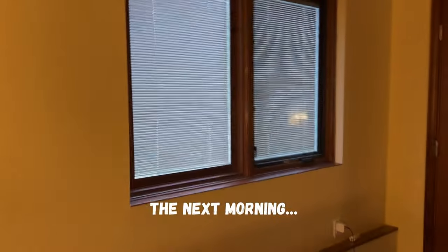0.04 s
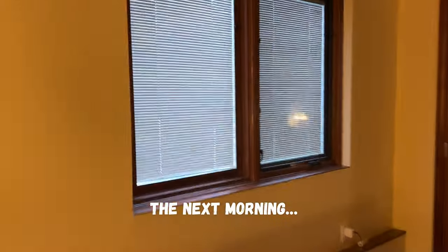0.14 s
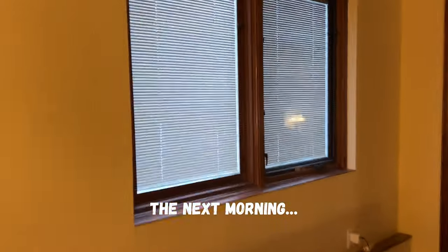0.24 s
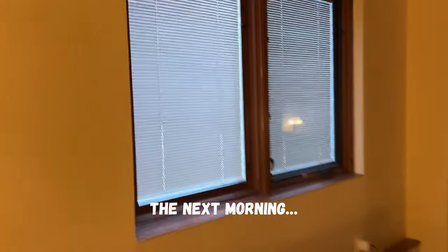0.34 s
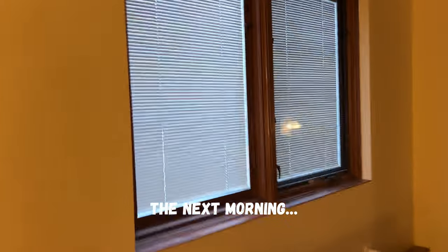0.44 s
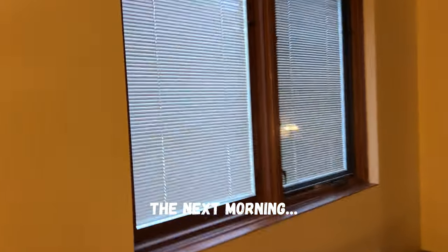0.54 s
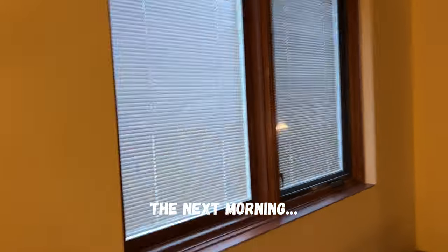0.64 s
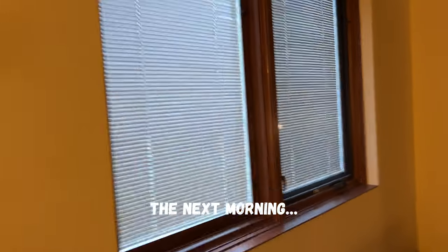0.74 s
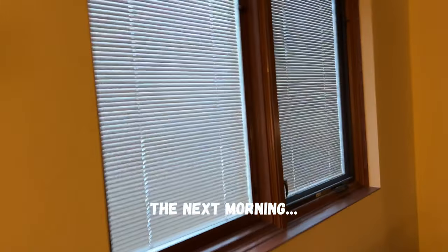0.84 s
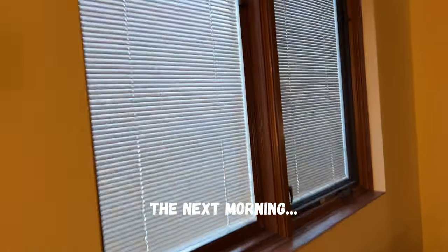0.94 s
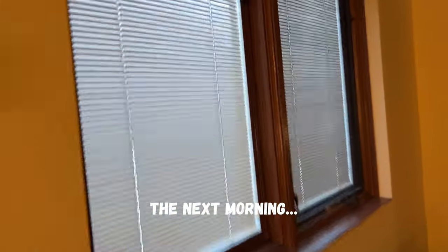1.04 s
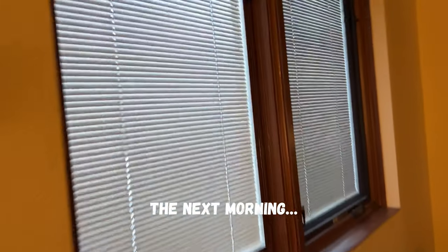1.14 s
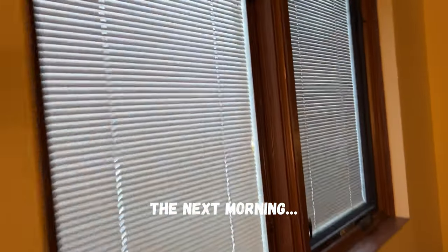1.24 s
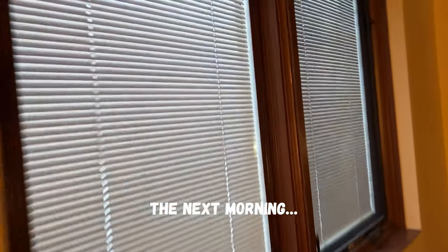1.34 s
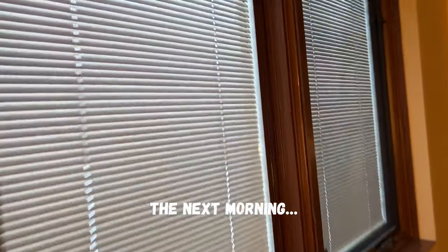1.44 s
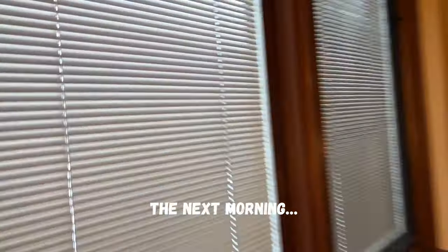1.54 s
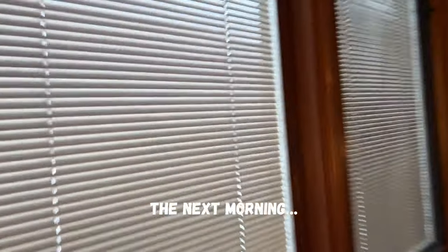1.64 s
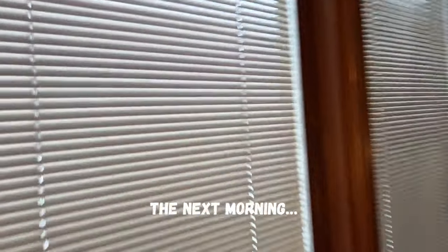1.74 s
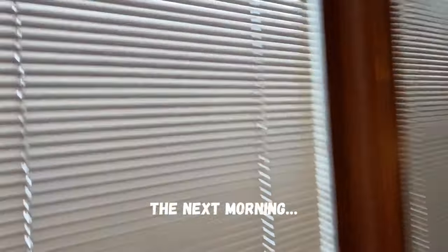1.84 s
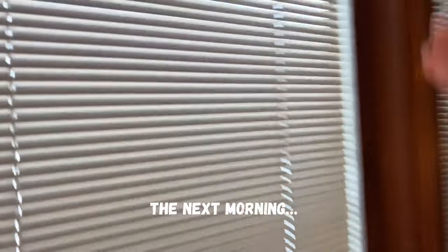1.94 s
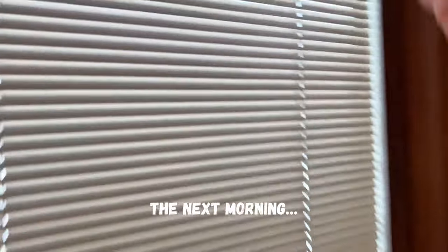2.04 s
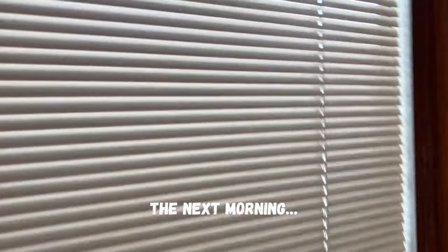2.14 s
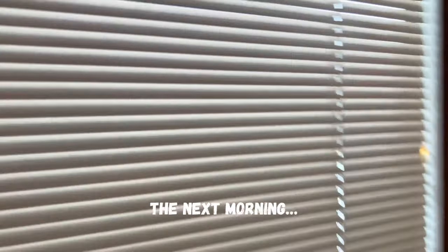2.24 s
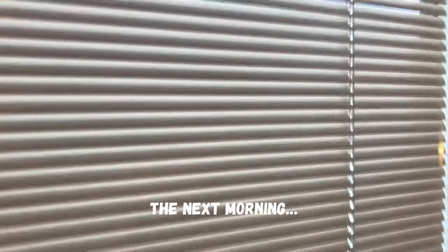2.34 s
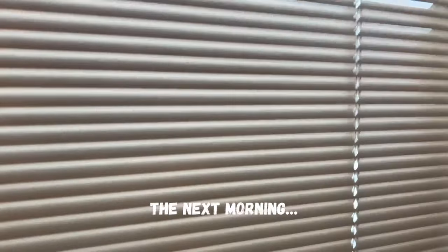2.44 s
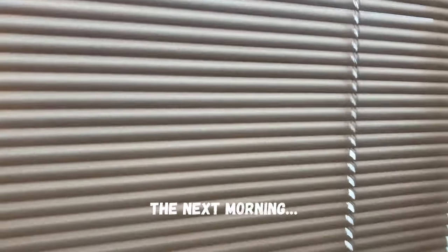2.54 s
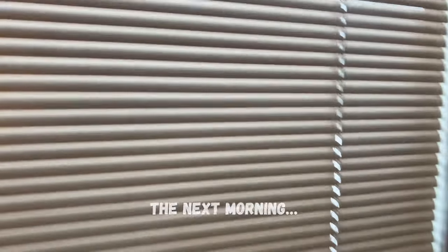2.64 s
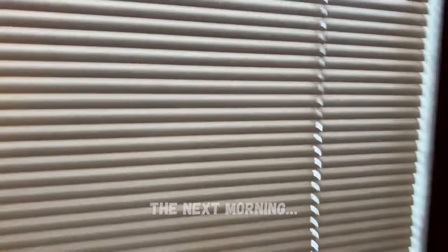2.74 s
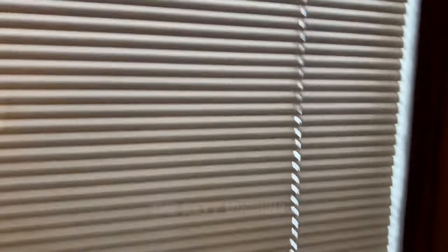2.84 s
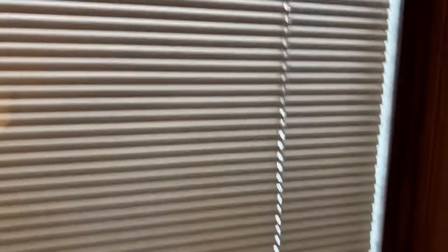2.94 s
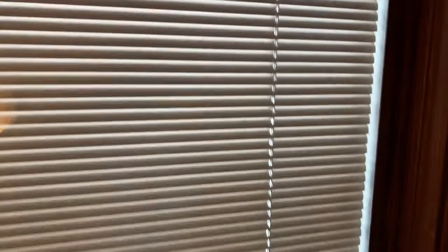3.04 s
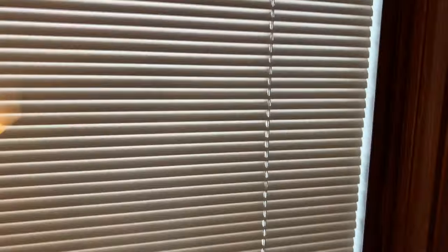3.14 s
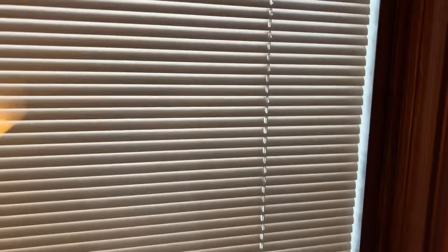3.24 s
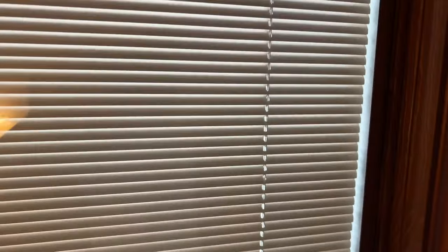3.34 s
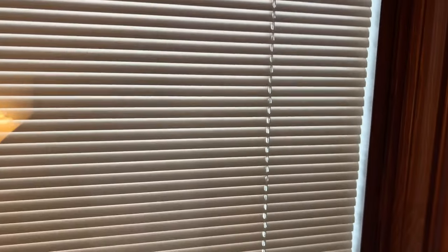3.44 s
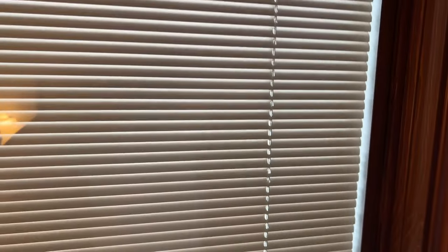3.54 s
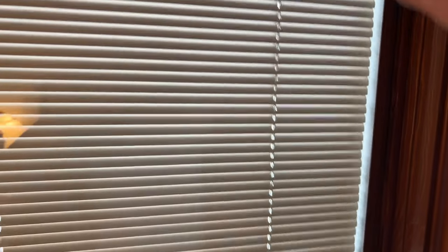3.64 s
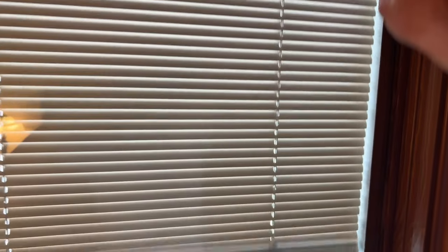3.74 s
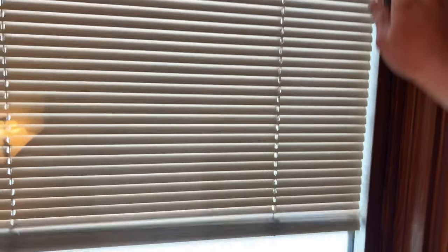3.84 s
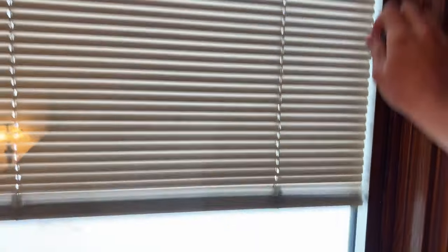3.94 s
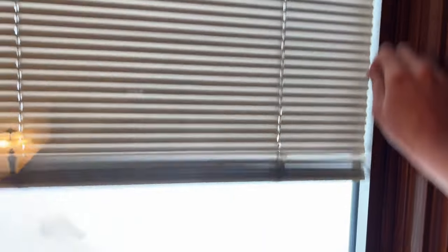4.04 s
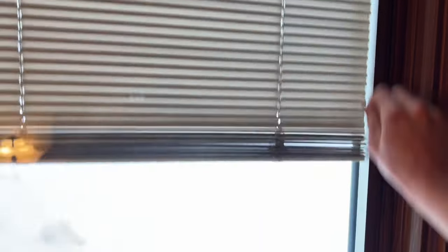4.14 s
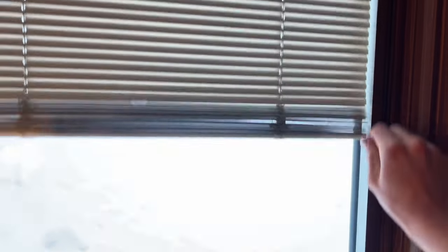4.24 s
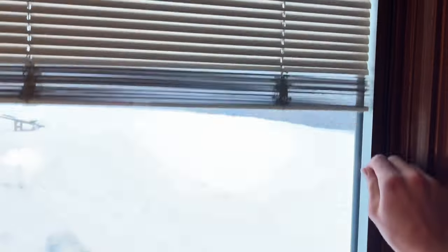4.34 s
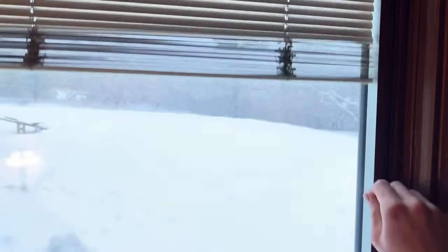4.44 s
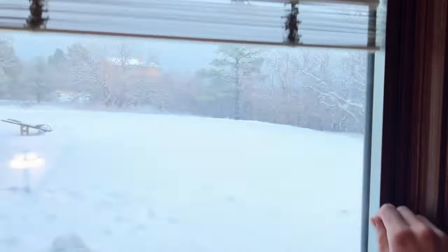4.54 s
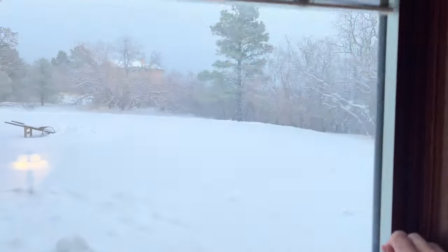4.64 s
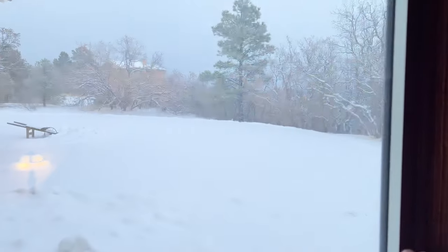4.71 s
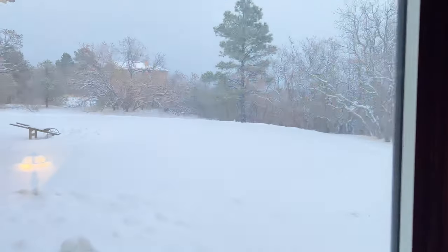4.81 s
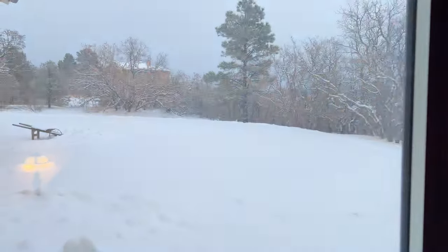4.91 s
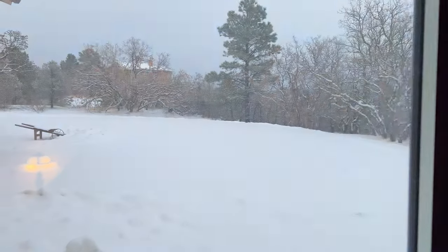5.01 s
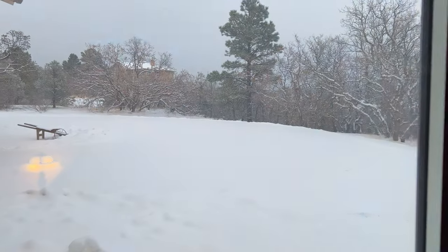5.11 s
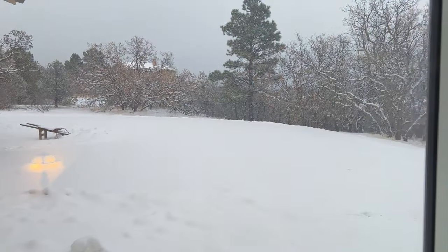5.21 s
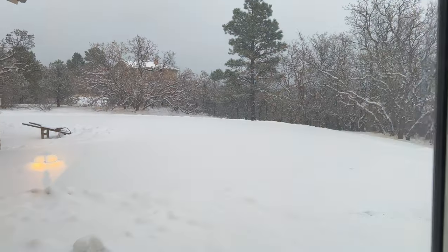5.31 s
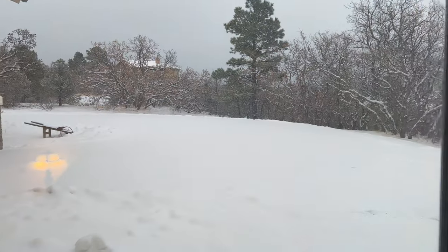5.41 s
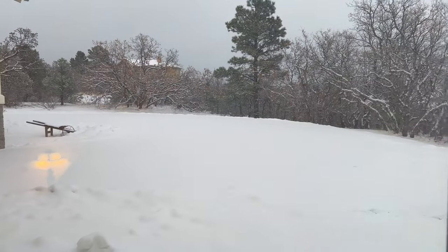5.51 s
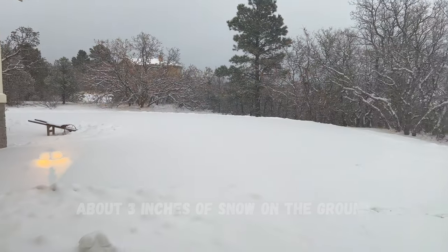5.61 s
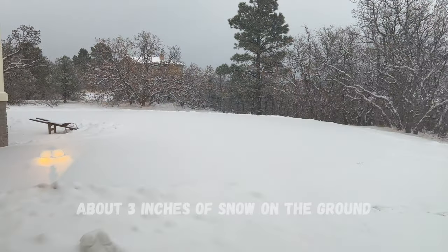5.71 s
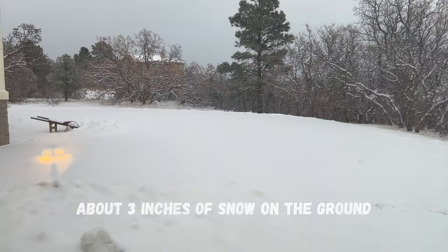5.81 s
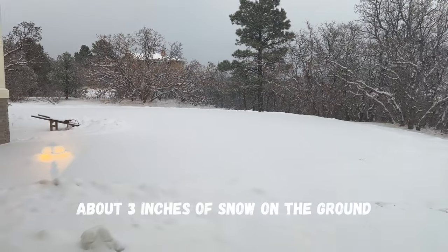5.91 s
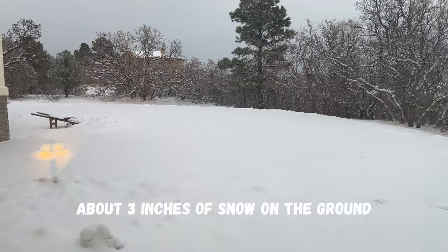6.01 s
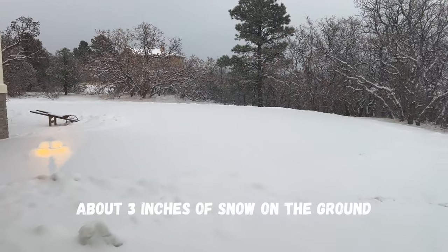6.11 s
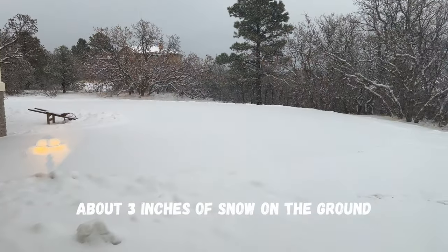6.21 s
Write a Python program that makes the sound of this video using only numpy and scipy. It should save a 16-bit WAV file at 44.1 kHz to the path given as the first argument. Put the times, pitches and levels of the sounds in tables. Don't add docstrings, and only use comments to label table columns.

```python
import sys
import numpy as np
from scipy import signal
from scipy.fft import rfft, irfft, next_fast_len
from scipy.io import wavfile
from scipy.ndimage import uniform_filter1d

SR = 44100
rng = np.random.default_rng(int(sys.argv[2]) if len(sys.argv) > 2 else 0)


def linear_from_db(decibels):
    return 10 ** (np.asarray(decibels, float) / 20)


def dump(signal):
    limited = np.clip(np.atleast_2d(signal).T, -1, 1)
    pcm = np.round(limited * 32767).astype(np.int16)
    wavfile.write(sys.argv[1], SR, pcm)


N = 276418


def evened(x):
    return x / np.sqrt(np.mean(x ** 2) + 1e-20)


def read(points, hz):
    f, value = np.transpose(points)
    return np.interp(np.log(hz + 1), np.log(f + 1), value)


def curves(tables, silent):
    t, out = np.arange(N) / SR, np.ones((len(tables[0][0]) - 1, N)) * silent
    for rows in tables:
        s, *columns = np.transpose(rows)
        inside = (t >= s[0]) & (t <= s[-1] + .01)
        out[:, inside] = [np.interp(t[inside], s, c) for c in columns]
    return uniform_filter1d(out, size=441, axis=1)


def swells(rows, floor_db, rise_db_s, fall_db_s):
    t = np.arange(0, N / SR + .01, .002)[:, None]
    s, hold, db = np.transpose(rows)[:3]
    level_db = db - rise_db_s * np.maximum(s - t, 0) - fall_db_s * np.maximum(t - s - hold, 0)
    gain = np.sqrt(linear_from_db(2 * floor_db) + linear_from_db(2 * level_db).sum(axis=1))
    return np.interp(np.arange(N) / SR, t[:, 0], gain)


def humps(x, rows):
    return sum(db * np.exp(-((x - at) / half) ** 2) for at, half, db in rows)


def wander(per_s):
    return evened(signal.sosfilt(signal.butter(2, per_s, fs=SR, output="sos"), rng.standard_normal(N)))


def grit(per_s, spread_db, smooth):
    size = linear_from_db(spread_db * np.minimum(rng.exponential(1, (2, N)), 4))
    hits = size * (rng.random((2, N)) < per_s / SR) * rng.standard_normal((2, N))
    return evened(hits) + smooth * rng.standard_normal((2, N))


def colour(x, spectrum):
    size = next_fast_len(N)
    gain = linear_from_db(read(spectrum, np.fft.rfftfreq(size, 1 / SR)))
    return evened(irfft(rfft(x, size) * gain, size)[..., :N])


def resonate(x, hz, width):
    turn = np.exp(2j * np.pi * np.cumsum(hz * np.ones(x.shape[-1])) / SR)
    r = np.exp(-np.pi * width / SR)
    return 2 * (turn * signal.lfilter([1 - r], [1, -r], x / turn)).real


def mode(x, hz, width):
    pole = np.exp((2j * hz - width) * np.pi / SR)
    return evened(signal.lfilter([1], [1, -2 * pole, pole ** 2], x).real)


def body(x, modes, patchy_db):
    return evened(sum(linear_from_db(db + patchy_db * wander(16.7)) * mode(x, hz, w * 1.283) for hz, w, db in modes))


def burst(hz, width, t60, echo=0.):
    t = np.arange(9000) / SR
    shape = linear_from_db(-60 * t / t60) + echo * linear_from_db(-60 * (t - .003) / t60) * (t > .003)
    return mode(rng.standard_normal((2, 9000)), hz, width) * shape * np.minimum(t * width / 0.72, 1)


def ring(hz, t60):
    t = np.arange(9000) / SR
    tone = np.sin(2 * np.pi * hz * t + np.array([[0], [1.5]]))
    return tone * linear_from_db(-60 * t / t60) * np.minimum(t / 0.00092, 1)


def add(mix, s, sound):
    part = mix[:, round(s * SR):][:, :sound.shape[1]]
    part += sound[:, :part.shape[1]]


def floor_rumble():
    # frequency in Hz, level in dB per Hz.
    rumble_spectrum = [(20, -34), (35, -6.5), (48, -5), (55, 3), (65, -1.5), (90, -7), (140, -15),
                       (250, -24), (500, -32.5), (1200, -45), (2500, -56)]
    # start in seconds, hold in seconds, level in dB.
    steps = [(0, 0.0074, -69), (.09, .02, -52.5), (.39, 0.14, -50.5), (.57, 0.016, -52), (.69, 0.017, -57),
             (.9, 0.032, -52.5), (1.02, 0.067, -51), (1.25, 0.014, -50.5), (1.36, 0.062, -53.5),
             (1.56, 0.41, -47.5), (2.02, 0.14, -45), (2.24, 0.017, -47), (2.37, 0.017, -42.5),
             (2.46, 0.33, -44.5), (2.71, 0.017, -54.5), (2.95, 2.75, -45), (5.72, 0.046, -48),
             (5.91, 0.045, -48), (6.12, .12, -43)]
    rumble = linear_from_db(0.39 * wander(9.9)) * colour(rng.standard_normal((2, N)), rumble_spectrum)
    return swells(steps, floor_db=-62, rise_db_s=420, fall_db_s=128) * rumble


def sleeve_rub():
    # start in seconds, hold in seconds, level in dB, resonance in Hz.
    rubs = [(0.097, .02, -72.5, 1920), (0.297, 0.024, -75, 1820), (.49, 0.18, -78.5, 1810),
            (0.806, 0.015, -69, 1740), (0.97, 0.26, -70, 1690), (1.382, 0.029, -71, 1620),
            (1.48, 0.037, -67, 1650), (1.673, 0.12, -68.5, 1760), (1.957, .07, -57, 1920),
            (2.06, 0.076, -62.5, 1890), (2.19, 0.25, -62, 1770), (2.553, 0.057, -58, 1900),
            (2.64, 0.066, -54.5, 1830), (2.856, 0.022, -51.5, 1570), (5.497, 0.18, -62.5, 1610),
            (6.102, .05, -62, 1570)]
    # frequency in Hz, width in Hz, level in dB.
    cloth_modes = [(3730, 270, 0.5), (5100, 160, -17), (6530, 300, -16)]
    s, hold, _, hz = np.transpose(rubs)
    rub_hz = np.interp(np.arange(N) / SR, s + hold / 2, hz)
    cloth = grit(4500, 1.7, 0.97)
    rub = evened(resonate(resonate(cloth, rub_hz, 380), rub_hz, 380)) * linear_from_db(0.88 * wander(4.5))
    rub += linear_from_db(-15) * body(cloth, cloth_modes, 2.5)
    return swells(rubs, floor_db=-85, rise_db_s=194, fall_db_s=162) * linear_from_db(7.5) * rub


def clothes_rustle():
    # frequency in Hz, level in dB per Hz.
    fizz_spectrum = [(300, 2.5), (1000, 3), (2300, 3.5), (2900, -5.5), (3300, 1), (4400, -2), (5300, -1.5),
                     (6000, -8), (6500, -18), (9000, -9), (13000, -15.5), (16000, -12)]
    # start in seconds, hold in seconds, level in dB.
    rustles = [(.125, 0.023, -73.5), (.28, 0.018, -76), (.35, 0.17, -72), (.62, .02, -72),
               (.74, 0.039, -78.5), (.98, .23, -72.5), (1.3, .02, -75.5), (1.46, 0.022, -73),
               (1.55, 0.11, -72), (1.71, 0.011, -66), (1.92, 0.055, -66), (2.02, 0.06, -61.5),
               (2.24, 0.012, -62), (2.37, 0.025, -72), (2.56, 0.18, -73), (2.87, .04, -64),
               (2.95, 3.8, -91), (5.76, 0.38, -74)]
    rustle = linear_from_db(9.5) * colour(grit(2500, 2.4, 1.0), fizz_spectrum)
    return swells(rustles, floor_db=-87.5, rise_db_s=196, fall_db_s=119) * rustle


def small_sounds():
    # start in seconds, level in dB, ring in Hz.
    taps = [(2.89, -33, 1110), (2.923, -40, 900), (2.962, -36, 1080), (3.135, -27, 1110),
            (3.299, -26, 1040), (3.311, -34, 1760), (3.331, -23, 1090), (3.352, -21, 1000),
            (3.374, -32, 1900), (3.403, -31, 1510), (3.462, -22, 980), (3.472, -21, 1780),
            (3.487, -23, 1524), (3.538, -23, 1290), (3.66, -30, 1110), (3.717, -21, 1490),
            (3.913, -23, 1390), (3.975, -15, 1470), (4.175, -17, 1500), (4.214, -25.5, 1450),
            (4.259, -25, 1630), (4.345, -26, 2300), (4.369, -23, 1410), (4.424, -22, 1450),
            (4.491, -21, 1405), (4.68, -21, 1340), (4.924, -26.5, 1480), (4.963, -25, 1281),
            (5.098, -26, 1387), (5.386, -41, 1219), (5.409, -39, 1370), (5.432, -36, 1411),
            (5.465, -34.5, 1380), (1.812, -49, 1510), (1.836, -43, 1600), (6.075, -44, 1530),
            (6.085, -34, 820), (6.105, -31, 1180), (6.13, -41, 1400), (6.165, -41, 1290)]
    # start in seconds, level in dB, centre in Hz, width in Hz.
    snaps = [(0.074, -66, 7500, 3000), (.11, -46, 4700, 1200), (0.111, -51, 8500, 5000),
             (.117, -50.5, 8900, 6000), (2.701, -42, 2000, 900), (4.396, -33.5, 14660, 600),
             (4.594, -39, 13800, 700), (3.285, -36, 12400, 5000), (3.319, -32, 12500, 5000),
             (3.451, -29, 12500, 5000), (3.337, -38, 11500, 4980), (3.47, -42.5, 13500, 3010),
             (4.433, -40.5, 11500, 4000), (.714, -60, 3600, 700), (.957, -54, 3600, 900),
             (1.2, -57, 3400, 1500), (1.304, -67, 4100, 700), (1.304, -68, 5400, 600),
             (1.706, -62, 2400, 1600), (1.725, -43, 3700, 700), (1.726, -53, 6500, 890),
             (1.725, -60, 1800, 700), (1.782, -42, 5100, 900), (5.726, -55, 3670, 803),
             (3.284, -32, 3000, 700), (3.319, -30, 3000, 696), (4.161, -22, 3177, 900),
             (4.41, -26, 3300, 800), (4.595, -30, 3500, 800)]
    # start in seconds, hold in seconds, level in dB,
    # centre in Hz, width in Hz.
    whistles = [(1.7, .06, -63, 3900, 350), (2.3, .06, -62, 3750, 350), (1.6, 0.044, -63, 6500, 250),
                (3.5, 0.035, -59, 3760, 570), (2.39, 0.036, -68, 4400, 250),
                (5.65, 0.094, -59.5, 1620, 130), (2.07, .04, -62, 6400, 330), (2.06, 0.037, -64, 4700, 250),
                (2.3, 0.032, -56.5, 1200, 500), (6.4, .14, -47, 9000, 500), (2.55, .12, -64, 3700, 300),
                (.15, .015, -72, 6500, 5000), (5.4, 0.18, -57, 5500, 230), (5.38, 0.17, -62, 4900, 210),
                (6.11, 0.084, -52, 800, 46), (6.09, 0.061, -44.5, 510, 65)]
    # start in seconds, level in dB, mode in Hz, t60 in seconds.
    panel = [(2.376, -33, 608, .09), (2.381, -32, 474, .1), (2.366, -35, 1100, .07), (2.394, -38, 930, .06),
             (2.412, -43, 1190, .12), (2.701, -32, 760, .08), (2.716, -37, 614, .08), (2.72, -38, 468, .1),
             (2.701, -37, 1400, .05), (6.095, -32, 390, .1)]
    whistle_rise_s, whistle_fall_s = 0.024, .03
    out = np.zeros((2, N))
    for s, db, hz in taps:
        add(out, s - .001, linear_from_db(db) * (ring(hz, 0.075) + 0.88 * burst(hz, 800, .03)))
    for s, db, hz, width in snaps:
        add(out, s - .001, linear_from_db(db) * burst(hz, width, .022))
    t = np.arange(-.1, .4, 1 / SR)
    for s, hold, db, hz, width in whistles:
        rise = (np.minimum(t, 0) / whistle_rise_s) ** 2
        fall = (np.maximum(t - hold, 0) / whistle_fall_s) ** 2
        add(out, s - .1, linear_from_db(db) * np.exp(-rise - fall) * mode(rng.standard_normal((2, len(t))), hz, width))
    for s, db, hz, t60 in panel:
        add(out, s, linear_from_db(db) * (.6 * ring(hz, t60) + .6 * burst(hz, 200, t60)))
    return out


def knocks():
    # start in seconds, crack in dB, body in Hz, body in dB re crack, treble in dB re crack.
    blows = [(0.0696, -55, 606, -1, -13), (0.11, -58.5, 580, 0, 3.5), (0.391, -57, 448, 2.5, -24),
             (1.0474, -47, 612, -9, -28), (1.3352, -67, 700, 7, -14), (1.782, -22.5, 1025, -31, -11.5),
             (2.0294, -46, 960, -7, -14.5), (2.3641, -30, 612, -4.5, -15), (2.7002, -31, 611, -4.5, -32)]
    # multiple of the body frequency, level in dB, t60 in seconds.
    wood_modes = [(.76, -1, .16), (1, 0, .09), (1.29, -1, .08), (1.56, -1, .07), (1.85, -3, .06)]
    # start in seconds, level in dB, t60 in seconds.
    thuds = [(.39, -46.5, 0.29), (1.336, -46, 0.1), (1.783, -29, 0.37), (2.028, -58, 0.21),
             (2.365, -35.5, 0.44), (2.701, -37.5, 0.25)]
    # start in seconds, level in dB, ring in Hz.
    ticks = [(.162, -57, 690), (0.284, -59, 1140), (.297, -60, 1000), (1.18, -60, 1230),
             (5.327, -31.5, 2050), (5.727, -40.5, 2050), (5.727, -38, 1620), (6.017, -45.5, 1102)]
    out = np.zeros((2, N))
    for s, db, hz, body_db, treble_db in blows:
        t60 = 0.12 + 0.28 * np.clip((db + 48) / 25, 0, 1)
        wood = sum(linear_from_db(d) * ring(k * hz, ring_s * np.sqrt(t60 / 0.114)) for k, d, ring_s in wood_modes)
        crack = 2.5 * ring(1420, 0.014) + burst(1650, 780, 0.033) + 0.27 * burst(1500, 810, t60)
        bulk = 0.92 * wood + 0.8 * burst(hz, 810, t60) + 0.089 * burst(320, 280, t60 * 0.82)
        treble = burst(4800, 2600, 0.022) + 0.29 * burst(3070, 4600, t60 * 1.05)
        top = burst(10200, 7000, 0.04) + 0.13 * burst(11500, 7000, t60)
        sound = crack + linear_from_db(body_db) * bulk + linear_from_db(treble_db + 9.0) * treble + linear_from_db(treble_db - 3) * top
        add(out, s - .001, linear_from_db(db) * sound)
    for s, db, t60 in thuds:
        add(out, s - .001, linear_from_db(db) * (burst(122, 130, t60) + 0.5 * burst(248, 174, t60 * 0.77)))
    for s, db, hz in ticks:
        add(out, s - .001, linear_from_db(db) * (1.63 * ring(hz, 0.036) + 0.58 * burst(hz, 450, 0.026)))
    return out


def clacks():
    # start in seconds, blow in dB, ring in Hz, edge brightness in dB.
    landings = [(3.069, -29.5, 1670, 7), (3.157, -23, 1920, 0.5), (3.285, -15, 1098, -4.5),
                (3.319, -13.5, 1757, -1.5), (3.336, -17.5, 1200, -8), (3.451, -11.5, 996, 1),
                (3.598, -28, 1600, 14), (3.691, -9.5, 1012, 3), (3.724, -15, 1557, -1.5),
                (3.841, -16, 1046, 0.5), (3.943, -6.5, 1008, -1), (3.976, -37, 1464, -19.5),
                (4.077, -17, 1510, -5), (4.16, -14.5, 1359, 10), (4.322, -22.5, 1419, 11.5),
                (4.396, -19, 1450, 13.5), (4.41, -18, 998, 2), (4.434, -18, 1780, 5),
                (4.555, -24, 1393, 13), (4.594, -23, 1950, 17.5), (4.613, -19, 1384, -5.5),
                (4.646, -13, 1426, 1), (4.727, -18, 1960, 6.5), (4.774, -22.5, 930, 10.5),
                (4.834, -21, 1341, -6), (4.997, -29, 1290, -4), (5.026, -22.5, 1430, -4),
                (5.204, -25.5, 1331, 6.5), (5.321, -29.5, 1461, -1), (6.097, -27.5, 1144, -6.5)]
    # start in seconds, level in dB, ring in Hz, t60 in seconds.
    pane_rings = [(6.11, -26, 175, 0.37), (.1125, -29.5, 400, 0.02), (1.786, -30.5, 230, .09),
                  (6.093, -24.5, 427, 0.1), (4, -22, 760, 0.3), (4.16, -20.5, 550, 0.32),
                  (4.548, -17.5, 610, .2), (4.74, -20, 665, 0.17), (4.83, -24.5, 750, .15),
                  (2.7, -40.5, 440, .1), (3.975, -19.5, 595, 0.3)]
    out = np.zeros((2, N))
    for s, db, hz, bright_db in landings:
        squeal_db, rasp_db, sparkle_db = bright_db + np.array([-17.5, -28.5, -15])
        sound = 0.64 * ring(hz, 0.065) + 0.41 * ring(rng.uniform(960, 1060), 0.071) + 0.17 * ring(1793, 0.031)
        sound += 0.8 * burst(1395, 900, 0.041, echo=0.57)
        sound += 0.13 * burst(1340, 900, 0.3) + 0.099 * burst(3300, 1200, 0.016)
        sound += linear_from_db(squeal_db + 5.5) * burst(5360, 950, 0.045)
        sound += linear_from_db(rasp_db + 4.0) * (burst(6070, 2640, 0.042) + 1.94 * burst(10140, 2000, 0.03))
        sparkle = burst(rng.uniform(13600, 15800), 1090, 0.021)
        sparkle += 0.245 * burst(19000, 5000, 0.0051) + 0.11 * burst(10040, 6600, 0.11)
        sound += linear_from_db(sparkle_db - 7.0) * sparkle
        add(out, s - .001, linear_from_db(db) * sound)
    for s, db, hz, t60 in pane_rings:
        add(out, s, linear_from_db(db) * ring(hz, t60))
    return out


def tooth_drone(hz, turns, level_db):
    # tooth rate in Hz, half width in Hz, lift in dB.
    pane_lift = [(171, 13, 2.5), (280.5, 34.6, 5)]
    # centre in seconds, half length in seconds, lift in dB.
    grips = [(3.534, 0.034, 9), (3.694, .015, -5), (3.715, .02, 2), (3.885, .02, 4), (3.8, 0.023, -1),
             (3.945, 0.012, -3), (3.987, .025, 3), (4.056, 0.036, 2.5), (4.125, .02, -6.5),
             (4.215, 0.031, 3.5), (4.285, .012, -6), (4.3, 0.011, 6), (4.403, 0.024, -1),
             (4.436, 0.018, 3.5), (4.56, 0.023, 4.5), (4.645, 0.016, -3.5), (4.69, .02, 7),
             (4.731, 0.013, -3), (4.793, 0.022, 3), (4.98, 0.036, -3.5), (5.162, 0.066, 7.5)]
    bite = np.maximum(1 + 0.42 * wander(45), 0)
    angle = 2 * np.pi * turns
    tooth = np.cos(angle) + 0.047 * np.cos(2 * angle) + 0.011 * np.cos(3 * angle)
    return linear_from_db(level_db + humps(hz, pane_lift) + humps(np.arange(N) / SR, grips)) * bite * tooth


def glass_boom(over_db, level_db):
    # frequency in Hz, width in Hz, level in dB.
    glass_modes = [(118.7, 7.4, -6.5), (129.5, 12.9, 0.5), (172, 18.6, 2), (212.7, 34, -3.5),
                   (274.9, 13.3, -1), (331, 27, 1.5), (368.9, 17.4, 1.5), (455.5, 32, -5)]
    shake = rng.standard_normal((2, N))
    upper_db = 0.94 + 0.48 * np.maximum(over_db, -12)
    upper_db = upper_db + humps(np.arange(N) / SR, [(3.8, .15, -7), (4.2, 0.152, 1)])
    panes = body(shake, glass_modes[:4], 2.1) + linear_from_db(upper_db) * body(shake, glass_modes[4:], 1.73)
    return linear_from_db(level_db + 2.06 * wander(17.0)) * panes * 0.71


def frame_scrape(rattle, level_db):
    # frequency in Hz, width in Hz, level in dB.
    frame_modes = [(632, 61, 9), (678.3, 37, 5), (776, 105, 7), (950, 113, 8.5), (1175, 47, 5.5),
                   (1450, 206, 13), (1780, 227, 10), (2050, 285, 1.5)]
    # centre in seconds, half length in seconds, lift in dB.
    surges = [(3.0, .05, 1), (3.198, .05, 0.5), (3.397, 0.049, 1.5), (3.55, 0.045, -0.5), (3.64, .04, -1.5),
              (3.78, 0.036, 1), (3.88, .04, -0.5), (4.029, .04, -0.5), (4.12, 0.027, -0.5),
              (4.228, 0.035, 0.5), (4.3, .04, -0.5), (4.458, .03, -2), (4.531, 0.026, -1.5),
              (4.687, 0.033, 0), (4.88, 0.044, -1), (5.06, .04, 0.5), (5.15, .04, -1)]
    return linear_from_db(level_db + humps(np.arange(N) / SR, surges)) * body(rattle, frame_modes, 1.88)


def track_hiss(gate, level_db):
    # frequency in Hz, level in dB per Hz.
    track_spectrum = [(1800, 9.5), (2600, -1.5), (3500, 12.5), (4300, 7), (5300, 4.5), (6200, -1),
                      (9000, 0), (11500, -3), (14500, -4), (16000, -7.5)]
    return linear_from_db(level_db) * colour(grit(2500, 1.39, 1.0) * gate, track_spectrum)


def track_squeal(gate, level_db):
    # frequency in Hz, width in Hz, level in dB.
    squeal_modes = [(5070, 310, 2.5), (5330, 185, 2), (5530, 330, -2)]
    return linear_from_db(level_db + 0.62 * wander(2.9)) * body(grit(2000, 2.5, 1.0) * gate, squeal_modes, 1.96)


def breakaway_squeak(rattle):
    t = np.arange(N) / SR
    centre_s, half_s, level_db, start_hz, glide_hz_s = 3.06, .09, -45.5, 5850, -1400
    squeak_hz = start_hz + glide_hz_s * np.clip(t - centre_s + half_s, 0, .3)
    squeak = evened(resonate(resonate(rattle, squeak_hz, 450), squeak_hz, 450))
    shape = np.exp(-((t - centre_s) / half_s) ** 4)
    return linear_from_db(level_db) * shape * (squeak + 0.48 * mode(rattle, 12400, 1500))


def pull():
    # time in seconds, tooth rate in Hz, effort in dB.
    tugs = [
        [(2.8, 173.8, -52.5), (3.0, 171.5, -40), (3.2, 172, -36.5), (3.31, 170.4, -39.5), (3.46, 172, -31.5),
         (3.57, 176.4, -30), (3.64, 250.1, -28.5), (3.77, 240, -30.5), (3.86, 199.7, -30), (3.94, 235.2, -29)],
        [(3.95, 300, -27.5), (4.05, 305.5, -27), (4.17, 243, -28.5), (4.42, 250, -29), (4.68, 273.4, -28.5),
         (4.8, 281.9, -28.5), (4.94, 249.2, -30.5), (5.06, 173.9, -32.5), (5.22, 171, -34.5)],
        [(5.23, 171, -35.5), (5.3, 169.9, -38.5), (5.365, 167.5, -45), (5.47, 165.8, -39.5),
         (5.535, 166.4, -44.5), (5.6, 166, -55), (5.7, 163.4, -68.5)],
        [(5.93, 170.8, -73.5), (6.06, 169.7, -51.5), (6.105, 170.4, -36), (6.19, 171, -52), (6.268, 170, -64)],
    ]
    # centre in seconds, half length in seconds, squeal in dB,
    # hiss in dB, glass in dB.
    track_states = [(2.8, 0.096, -36, -16, -14), (3.048, 0.13, 7, 4, -5.5), (3.31, .07, -0.5, 4.5, -1.5),
                    (5.496, 0.15, 0.5, -5, -0.5), (6.072, 0.026, -3, 7.5, -6),
                    (6.182, 0.077, -13, -22, 3.5)]
    t = np.arange(N) / SR
    hz, effort_db = curves(tugs, silent=[[170], [-100]])
    over_db = effort_db + 30
    s, half, *state_db = np.transpose(track_states)
    squeal_lift, hiss_lift, glass_lift = (humps(t, zip(s, half, db)) for db in state_db)
    turns = np.cumsum(hz * (1 + 0.0355 * wander(34.24))) / SR
    gate = 1 + 0.041 * np.cos(2 * np.pi * turns)
    judder = linear_from_db(0.46 * wander(29))
    rattle = grit(1500, 1.4, 0.82) * gate + 0.4 * grit(90, 0.52, 0)
    drone = tooth_drone(hz, turns, -25.5 + over_db + glass_lift)
    boom = glass_boom(over_db, -23.5 + 0.89 * over_db + glass_lift)
    rubbing = frame_scrape(rattle, -25 + 1.087 * over_db)
    rubbing = rubbing + track_hiss(gate, -35.5 + 1.24 * over_db + hiss_lift)
    rubbing += track_squeal(gate, -36 + 1.25 * over_db + squeal_lift)
    rubbing += breakaway_squeak(rattle)
    bass_cut = signal.butter(2, 85, "high", fs=SR, output="sos")
    return signal.sosfilt(bass_cut, drone + boom + judder * rubbing)


def scene():
    air = floor_rumble() + sleeve_rub() + clothes_rustle()
    return air + small_sounds() + knocks() + clacks() + pull()


def low_pass(x):
    return signal.sosfilt(signal.butter(12, 16470, fs=SR, output="sos"), x)


def record(dry):
    # frequency in Hz, level in dB.
    shadow = [(30, 1), (100, -3), (400, -3.5), (700, -3.5), (1700, -7.5), (3000, -6.5), (4200, -8),
              (5300, -19.5), (6200, -3)]
    # frequency in Hz, likeness of the ports from 0 to 1.
    likeness = [(30, 0.97), (200, 0.99), (400, 0.69), (650, 0.32), (1100, 0.26), (1700, .2), (6000, 0.18)]
    lead_s, shared_hz, edge_hz = .00015, 6700, 16400
    size = next_fast_len(N)
    hz, (near, other) = np.fft.rfftfreq(size, 1 / SR), rfft(dry, size)
    same = np.clip(read(likeness, hz), 0, 1)
    turn = np.exp(1j * (np.clip(hz - 550, 0, 900) / 480 - .35))
    shadowed = linear_from_db(read(shadow, hz)) * (same * near * turn + np.sqrt(1 - same ** 2) * other)
    shared = near * np.exp(2j * np.pi * hz * lead_s)
    top = np.clip((hz - shared_hz) / 500 + .5, 0, 1)
    ports = np.array([dry[0], irfft((1 - top) * shadowed + top * shared, size)[:N]])
    ports = signal.oaconvolve(ports, signal.firwin(255, edge_hz, fs=SR)[None], "same")
    return low_pass(np.clip(ports, -1, 1))


dry = scene()
out = record(dry)
dump(out)
```